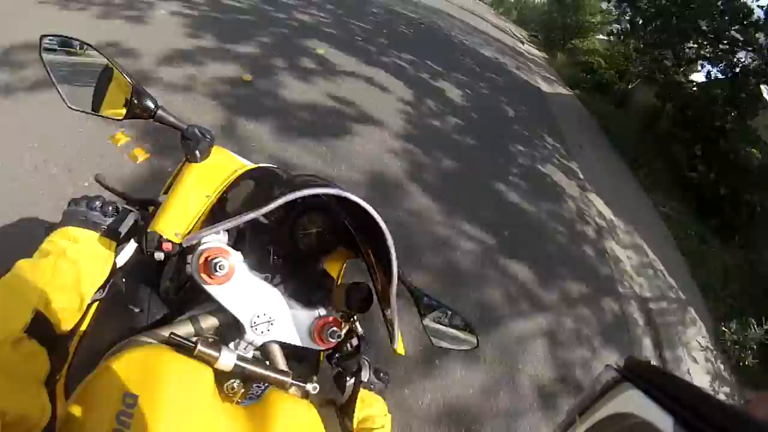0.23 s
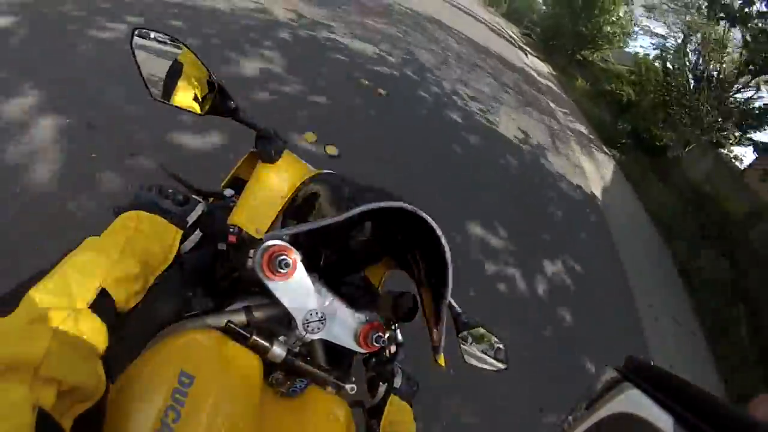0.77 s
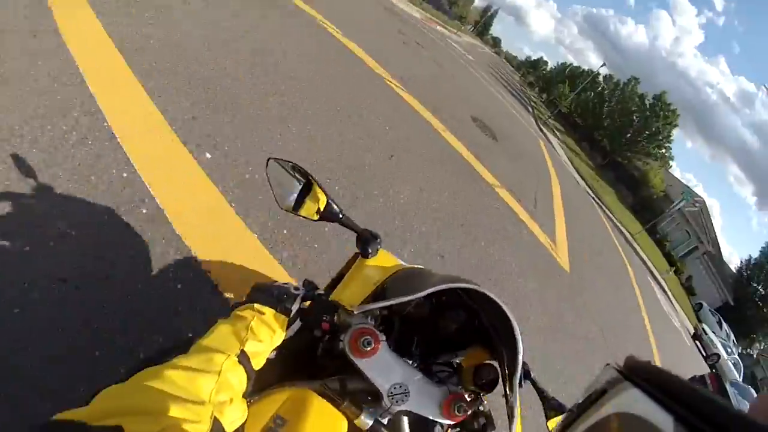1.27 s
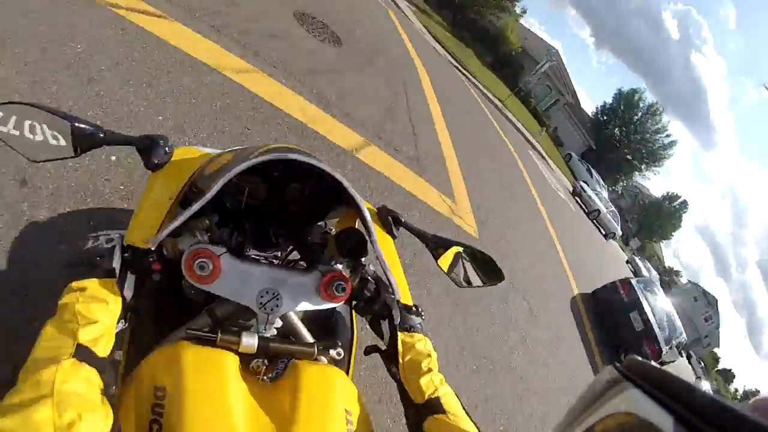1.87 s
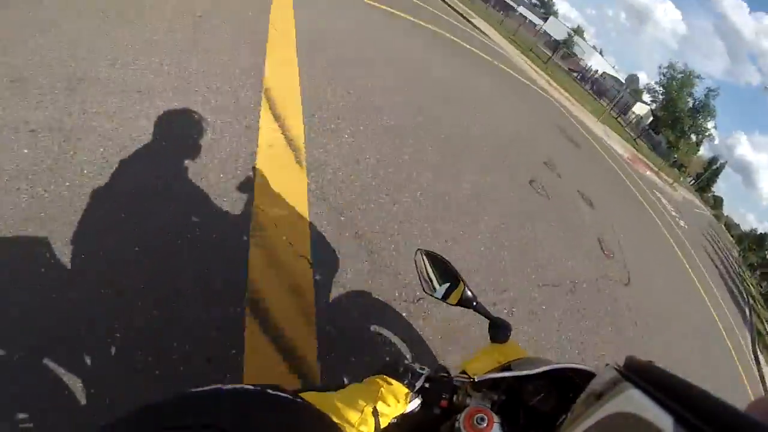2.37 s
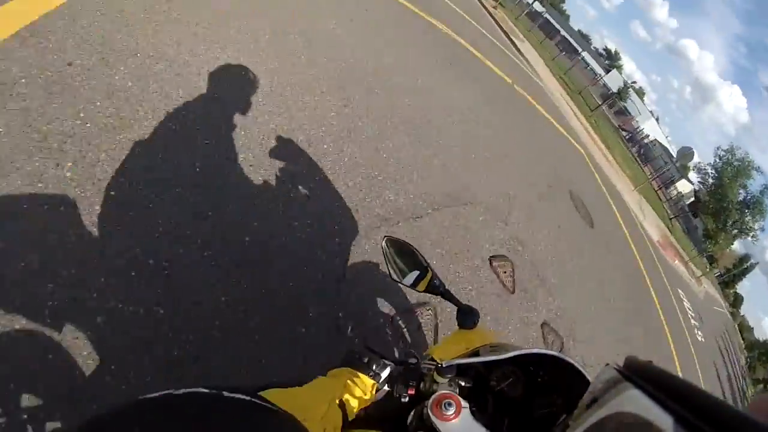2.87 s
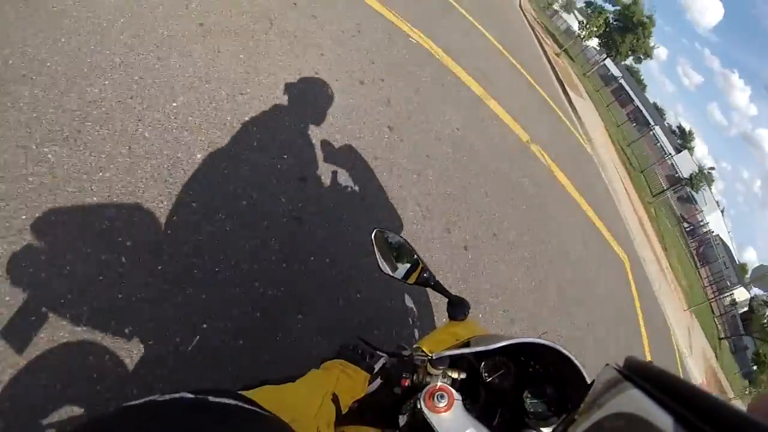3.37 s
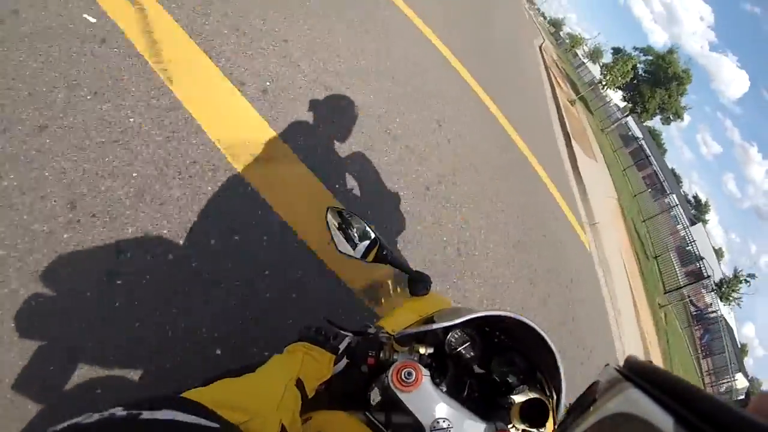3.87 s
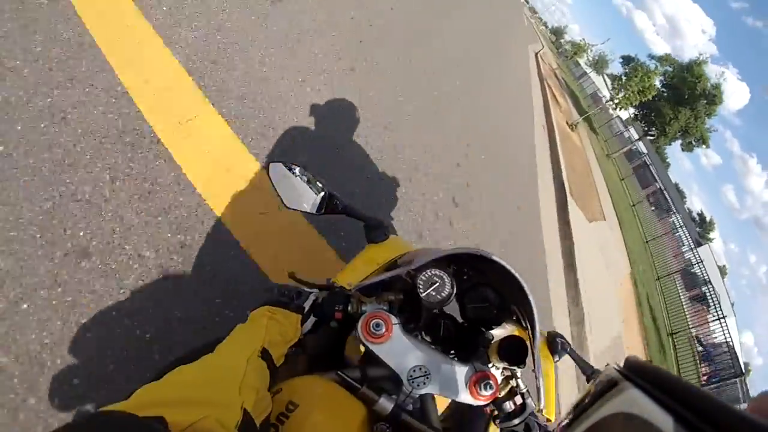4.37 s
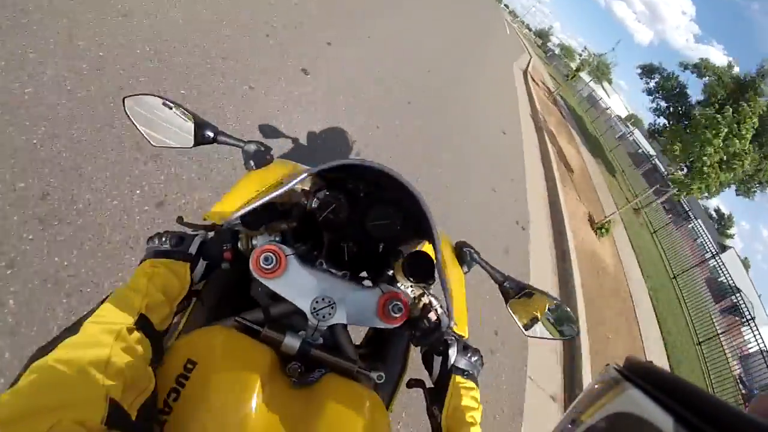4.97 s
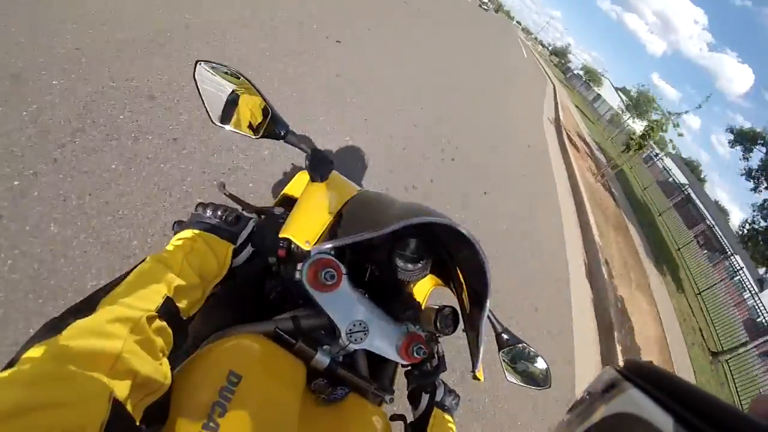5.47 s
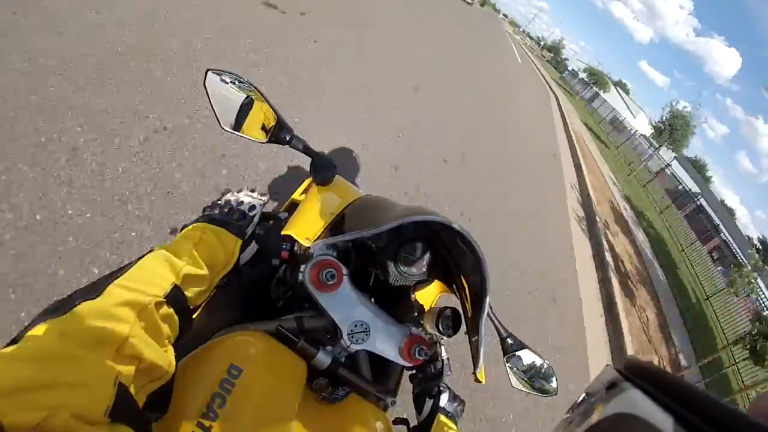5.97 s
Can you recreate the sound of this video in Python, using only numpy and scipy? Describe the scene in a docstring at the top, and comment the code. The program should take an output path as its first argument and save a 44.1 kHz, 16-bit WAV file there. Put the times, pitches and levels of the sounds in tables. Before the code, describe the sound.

From the rider's helmet, a lumpy motorcycle engine hums along, suddenly drops to slow thudding, then accelerates in one long climbing growl.

```python
"""Inside a rider's helmet on a V-twin motorcycle: it cruises, then after an abrupt cut coasts nearly at idle,
takes up the drive with a dull knock and accelerates. Uneven intake pulses ring the airbox, exhaust pulses
thud through pipe resonances and a fifth-order tone booms below. Shaped noise makes the valve gear and clutch
clatter, phase-modulated tones the gear whine, lumpy low noise the wind. One crank times all engine parts."""
import sys
import numpy as np
from scipy.fft import rfft, irfft, next_fast_len
from scipy.io import wavfile
from scipy.ndimage import uniform_filter1d, map_coordinates

SR = 44100
rng = np.random.default_rng(int(sys.argv[2]) if len(sys.argv) > 2 else 0)


def wrap_up_sound(samples):
    """Save the sound to the file named by the first command line argument, as 16-bit audio."""
    columns = np.atleast_2d(samples).T
    # keep every value between -1 and 1, then stretch to whole-number steps
    tamed = np.clip(columns, -1, 1)
    steps = np.round(tamed * 32767).astype(np.int16)
    wavfile.write(sys.argv[1], SR, steps)


N = 274736
TIME = np.arange(N) / SR
CUT_S = 1.034  # cruise before, pull after
MID_SPEED_HZ = 24  # four-stroke cycles per second


def amp(db):
    """Decibels to gain."""
    return 10 ** (np.asarray(db) / 20)


def unit(x):
    """Scale to rms 1."""
    return x / np.sqrt(np.mean(x ** 2) + 1e-20)


def steady(x):
    """Scale to a running rms of about 1."""
    power = uniform_filter1d(uniform_filter1d(x ** 2, size=9000), size=6000)
    return x / np.sqrt(np.abs(power) + 1e-20)


def curves(rows):
    """One value per sample for each column after the time."""
    knot_s, *columns = np.transpose(rows)
    return np.array([np.interp(TIME, knot_s, column) for column in columns])


def wobble(rate_hz):
    """Smooth random curve with rate_hz knots a second."""
    knots = rng.standard_normal(int(N * rate_hz / SR) + 4)
    return map_coordinates(knots, [TIME * rate_hz])


def filtered(x, response):
    """Multiply the spectrum of x by a complex response of frequency."""
    m = next_fast_len(N + SR // 2)  # padded against wrap-round
    return irfft(rfft(x, m) * response(np.fft.rfftfreq(m, 1 / SR)), m)[:N]


def colour(points, hz):
    """Gain of (frequency [Hz], level [dB]) points joined on a log axis."""
    point_hz, db = np.transpose(points)
    return amp(np.interp(np.log(hz + 1), np.log(point_hz), db))


def resonate(x, modes, edge_hz):
    """Ring parallel band-pass modes of alternating sign, muffled above an edge."""
    def response(f):
        body = 0
        for k, (centre, width, db) in enumerate(modes):
            damping = 1j * f * width
            body = body + (-1) ** k * amp(db) * damping / (centre * centre - f * f + damping)
        return body / (1 + (f / edge_hz) ** 8)
    return filtered(x, response)


def panels(hz):
    """Gain that the ringing panels of the engine casing add."""
    # casing panels: (centre [Hz], width [Hz], lift [dB])
    panel_modes = [(662.7, 46, 7.5), (914, 113, 7.5), (1250, 237, 7), (1548, 128, 6.5), (1988, 210, 8),
                   (2160, 185, 4), (2517, 117, 6.5), (3115, 160, 3), (3910, 160, 6.5), (4580, 100, 7.5),
                   (5620, 125, 8), (6600, 350, 2)]
    return amp(sum(db / (1 + (2 * (hz - c) / w) ** 2) for c, w, db in panel_modes))


def speed():
    """Engine speed in four-stroke cycles per second; it jumps at the cut."""
    # engine speed before the cut: (time [s], speed [cycles/s])
    cruise_speed = [(0, 23.24), (.15, 23.33), (.39, 24.09), (.59, 23.85), (.77, 24.7), (1.03, 24.8)]
    # engine speed after the cut: (time [s], speed [cycles/s])
    pull_speed = [(1.03, 9.82), (1.28, 9.69), (1.41, 12.77), (1.73, 14.51), (1.93, 13.57), (2.28, 15.03),
                  (2.62, 17.29), (2.77, 17.46), (2.94, 19.57), (3.15, 20.24), (3.49, 22.75), (3.85, 24.26),
                  (4.0, 25.52), (4.79, 28.65), (5.04, 29.08), (5.75, 35.42), (6.0, 37.04), (6.23, 39.25)]
    return np.where(TIME < CUT_S, curves(cruise_speed)[0], curves(pull_speed)[0])


def octaves():
    """Doublings of engine speed above mid speed."""
    return np.log2(speed() / MID_SPEED_HZ)


def crank():
    """Engine position in four-stroke cycles: integrated speed, with a new start at the cut."""
    cruise = .603 + np.cumsum(speed()) / SR
    pull = 26.06 + np.cumsum(speed() * (TIME >= CUT_S)) / SR
    return np.where(TIME < CUT_S, cruise, pull)


def loudness(law, load):
    """Gain of a source that varies with engine speed and load."""
    db, per_octave_db, coasting_db = law
    return amp(db + per_octave_db * octaves() - coasting_db * (1 - load))


def pulses(cycle, angle, scatter_db, jitter_s):
    """One pulse a cycle at a given engine position, each a little different in size and time."""
    at = np.flatnonzero(np.diff(np.floor(cycle - angle)) > 0)
    at = at[np.abs(at - CUT_S * SR) > 2]  # no pulse from the jump in position
    size, shift = rng.standard_normal((len(at), 2)).T
    at = np.clip(at + (shift * jitter_s * SR).astype(int), 0, N - 1)
    return np.bincount(at, amp(scatter_db * size), N)


def rattle(cycle, locked, surge_db, grain_db, smoothing=0.17):
    """Dense metal contacts: part repeat every cycle, all surge as the valves seat, most at low revs."""
    pattern = rng.standard_normal(size=320)
    repeating = unit(map_coordinates(pattern, [cycle % 1 * len(pattern)], order=1, mode="grid-wrap"))
    share = np.clip(locked, 0, 1)
    contacts = np.sqrt(share) * repeating * 0.35 + np.sqrt(1 - share) * rng.standard_normal(N)
    seating = np.exp(4 * (np.cos(2 * np.pi * (cycle - .32)) - 1))
    seating += 0.9 * np.exp(6 * (np.cos(2 * np.pi * (cycle - .72)) - 1))
    surge = surge_db * (1 - smoothing * octaves()) * seating
    return contacts * amp(surge + grain_db * wobble(350))


def wind():
    """Air tumbles round the helmet in lumps: a stream that grows with engine speed, and a few gusts."""
    # spectrum of the buffeting: (frequency [Hz], level [dB])
    buffet = [(12, -1), (25, -4.5), (50, 3), (68, 0), (100, -9), (160, -14), (280, -19.5), (450, -33),
              (900, -71)]
    # gusts on the helmet: (time [s], half-length [s], level [dB])
    gusts = [(0.403, 0.35, -50), (0.94, 0.085, -50), (2.42, 0.2, -52.5), (3.1, 0.15, -48),
             (3.505, .18, -47.5), (6.22, 0.11, -48.5)]
    noise = filtered(rng.standard_normal(N), lambda f: colour(buffet, f))
    stream = amp(-56.5 + 2 * octaves())  # dB at mid speed, dB per octave
    gust_power = sum(amp(db) ** 2 * np.exp(-((TIME - s) / half) ** 2) for s, half, db in gusts)
    return np.sqrt(stream ** 2 + gust_power) * unit(noise * amp(0.36 * wobble(6.1)))


def knocks():
    """The drive takes up its slack: an impulse rings a few dull, heavily damped modes."""
    # knocks: (time [s], peak level [dB])
    drive_knocks = [(2.04, -40.5)]
    # knock resonances: (centre [Hz], width [Hz], level [dB])
    knock_modes = [(130, 115, 1), (270, 230, -2.5), (420, 57, -8), (650, 91, -18)]
    out = np.zeros(N)
    for s, db in drive_knocks:
        impulse = 1. * (np.arange(N) == round(s * SR))
        ring = resonate(impulse, knock_modes, edge_hz=720)
        out += amp(db) * ring / np.abs(ring).max()
    return out


def clutch(cycle):
    """Loose plates chatter in surges locked to the crank and ring a few modes."""
    # clutch resonances: (centre [Hz], width [Hz], level [dB])
    clutch_ring = [(2120, 200, 0), (2470, 230, -1.5), (3280, 400, -7.5)]
    chatter = rattle(cycle, locked=.3, surge_db=4.0, grain_db=-0.5)
    return unit(resonate(chatter, clutch_ring, edge_hz=4700))


def whine(cycle, teeth, lurch_rad, blur_rad):
    """Gear mesh tone; the crank lurches within each cycle and backlash blurs the pitch."""
    turn = 2 * np.pi * cycle
    tone = np.sin(teeth * turn + lurch_rad * np.sin(turn) + blur_rad * wobble(110))
    return unit(tone * amp(2.5 * np.cos(turn - 1.3) + 3.0 * wobble(140)))


def gears(cycle, load, hiss_db):
    """Three meshes whine under drive or braking; tones flare as they cross cover and casing modes."""
    # primary, gearbox, cam drive: (teeth [per cycle], level before the covers [dB], growth [dB/octave],
    # coasting loss [dB], lurch [rad], blur [rad])
    meshes = [(62.14, -59.5, 4.5, 14, 1.5, 1.0), (46, -67, 17.5, 6.5, 0.44, .45),
              (30.07, -64.5, 13, 11, 0.34, .25)]
    # gear covers: (centre [Hz], width [Hz], level [dB])
    covers = [(647, 67, -2), (908, 54, 2.5), (1274, 80, 3.5), (1472, 90, -1.5), (1647, 99, 0.5),
              (2100, 240, -3)]
    # casing modes rung by the overtone: (centre [Hz], width [Hz], level [dB])
    singing = [(4570, 68, -2), (5740, 140, 4.5), (6530, 600, -7)]
    tones = []
    for teeth, *law, lurch_rad, blur_rad in meshes:
        tones.append(loudness(law, np.abs(load)) * whine(cycle, teeth, lurch_rad, blur_rad))
    cruising = amp(9 * (TIME < CUT_S))  # +9 dB on primary and overtone
    mesh = resonate(cruising * tones[0] + sum(tones[1:]), covers, edge_hz=5400)
    overtone = resonate(whine(cycle, teeth=191, lurch_rad=2.1, blur_rad=2.7), singing, edge_hz=12000)
    return mesh + amp(hiss_db - 16.5) * cruising * unit(overtone)  # overtone level follows the hiss


def mechanics(cycle, clatter_db, hiss_db):
    """Valve gear and clutch plates rattle the casing panels, with a finer hiss on top."""
    # clatter spectrum: (frequency [Hz], level [dB])
    casing = [(200, -10.5), (400, -7), (520, -8.5), (780, -7), (1100, -5.5), (1400, -2.5), (1650, -2),
              (1820, -6), (2300, -2), (2800, -9), (3400, -8.5), (3700, -23), (5000, -54)]
    # hiss spectrum: (frequency [Hz], level [dB])
    hiss_spectrum = [(2500, -21), (3600, -0.5), (4200, -2), (5100, -3), (6200, -3.5), (7200, -4.5),
                     (8200, -15), (9800, -20.5), (11000, -19), (12700, -28)]
    coarse = rattle(cycle, locked=0.52, surge_db=3.5, grain_db=0.7)
    clatter = filtered(coarse, lambda f: colour(casing, f) * panels(f))
    fine = rattle(cycle, locked=0.042, surge_db=2.0, grain_db=1.3)
    hiss = filtered(fine, lambda f: colour(hiss_spectrum, f) * panels(f))
    return amp(clatter_db) * steady(clatter) + amp(hiss_db) * steady(hiss)


def drone(cycle, waver_db, angle=0.2):
    """Both cylinders push nearly in step on the fifth order, which booms as it sweeps through hollows."""
    # hollows: (centre [Hz], width [Hz], level [dB])
    boom = [(95.6, 20, -4), (197.4, 32, 8)]
    fifth = np.sin(2 * np.pi * 5 * (cycle - angle))
    hollows = sum(amp(db) / np.hypot(1, 2 * (5 * speed() - hz) / width) for hz, width, db in boom)
    return unit(fifth * amp(waver_db * wobble(6.9))) * hollows


def exhaust(cycle):
    """A limping pair of pulses thuds through the silencers, loudest where orders meet resonances."""
    # silencer resonances: (centre [Hz], width [Hz], level [dB])
    pipe = [(55.3, 26, 4), (107, 38, 1), (132.3, 22.6, -7)]
    first = pulses(cycle, angle=0.97, scatter_db=-1.0, jitter_s=0.0003)
    second = pulses(cycle, angle=0.3554, scatter_db=0.6, jitter_s=0.00038)
    return unit(resonate(0.58 * first + second, pipe, edge_hz=280))


def intake(cycle, turbulence_db=-18):
    """Two cylinders gulp at uneven intervals; the airbox rings lower and longer at low revs."""
    # airbox at low revs: (centre [Hz], width [Hz], level [dB])
    slow_airbox = [(197.8, 22.7, -1), (233, 33, -5.5), (267, 36.5, 2), (300.6, 58, -4)]
    # airbox at high revs: (centre [Hz], width [Hz], level [dB])
    fast_airbox = [(220.4, 51, -2), (286, 66, 2), (356, 76.7, -1.5), (407, 103, -10.5), (473, 74, -18.5)]
    first = pulses(cycle, angle=.858, scatter_db=0.3, jitter_s=.00006)
    second = pulses(cycle, angle=0.2454, scatter_db=0.75, jitter_s=.00008)
    second_db = 2 - 3.5 * octaves()  # over the first; fades as speed rises
    gulps = steady(first + amp(second_db) * second) + amp(turbulence_db) * rng.standard_normal(N)
    sharp = np.clip((speed() - 16) / 8, 0, 1)  # crossfade from 16 to 24 cycles/s
    slow = resonate(gulps, slow_airbox, edge_hz=338)
    fast = resonate(gulps, fast_airbox, edge_hz=480)
    return steady((1 - sharp) * slow + sharp * fast)


def scene():
    """One crank times the engine; gas, meshes and clutch follow the load, clatter and hiss a level curve."""
    # engine load: (time [s], load [1 = hard pull, 0 = coasting, below 0 = engine braking])
    load_curve = [(0, 0.69), (.85, 0.72), (1.01, 0.82), (1.07, -1.25), (1.28, -1.25), (1.4, 0.21),
                  (1.9, -0.042), (2.25, 0.6), (2.9, 0.86), (3.15, 0.94), (4.1, 0.87), (4.95, 0.77),
                  (5.25, 0.88), (6.23, 0.83)]
    # casing clatter after the cut: (time [s], level [dB])
    pull_clatter = [(1.05, -65), (1.3, -65.5), (1.7, -61.5), (2.8, -62), (3.7, -58.5), (4.2, -55.5),
                    (4.7, -54.5), (5.15, -50.5), (6.23, -45.5)]
    # loudness laws: (level at mid speed and full load [dB], growth [dB/octave], coasting loss [dB])
    intake_law = (-48, .5, 15)
    exhaust_law = (-51, -4, 5.5)
    drone_law = (-58.5, 0.39, 3)  # level before the hollows
    clutch_law = (-74, 0, -2)  # negative loss: louder as the load comes off
    cycle = crank()
    load, = curves(load_curve)
    throttle = np.maximum(load, 0)
    clatter_db = np.where(TIME < CUT_S, -52.5, curves(pull_clatter)[0])
    # -73 dB at mid speed over a -55 dB clatter
    hiss_db = -73 + .8 * (clatter_db + 55) + 4 * octaves()
    gas = loudness(exhaust_law, throttle) * exhaust(cycle)
    gas += loudness(intake_law, throttle) * intake(cycle)
    gas += loudness(drone_law, throttle) * drone(cycle, waver_db=-1.05)
    metal = mechanics(cycle, clatter_db, hiss_db) + gears(cycle, load, hiss_db)
    metal += loudness(clutch_law, throttle) * clutch(cycle)
    low = filtered(gas + wind(), lambda f: 1 / (1 + (f / 2000) ** 4))  # rolls off above 2 kHz
    return (low + metal + knocks())[None]


def record(dry):
    """The microphone channel adds a faint hiss and keeps nothing above its band limit."""
    hiss = amp(-84.5) * rng.standard_normal(N)
    band_limit_hz = 12750
    return filtered(dry[0] + hiss, lambda f: f < band_limit_hz)[None]


dry = scene()
out = record(dry)
wrap_up_sound(out)
```